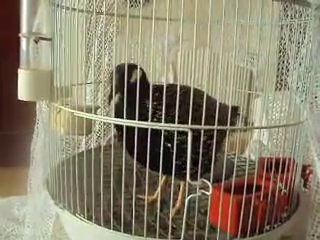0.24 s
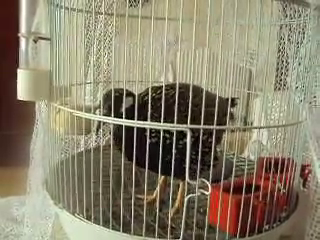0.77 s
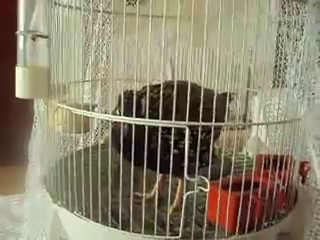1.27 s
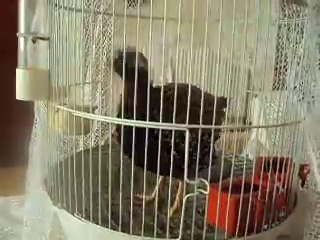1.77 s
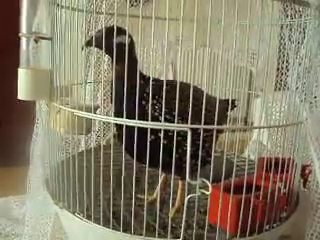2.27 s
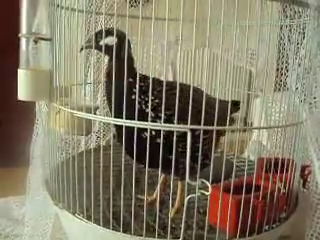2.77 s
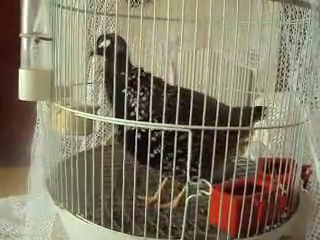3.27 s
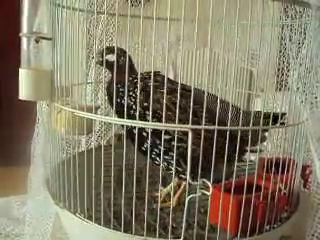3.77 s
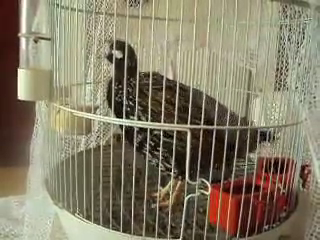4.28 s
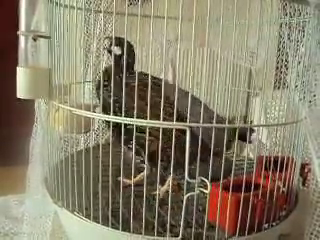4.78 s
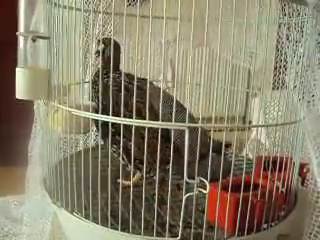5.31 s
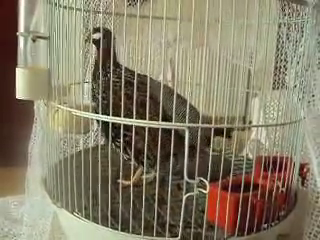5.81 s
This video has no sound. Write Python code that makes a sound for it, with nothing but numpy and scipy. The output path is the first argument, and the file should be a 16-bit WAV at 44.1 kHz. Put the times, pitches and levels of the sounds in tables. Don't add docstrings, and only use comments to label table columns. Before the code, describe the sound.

A caged bird whistles once, softly brushes the floor, then bursts into five grating, overloaded calls while a vehicle engine drones dully outside.

```python
import sys
import numpy as np
from scipy import signal
from scipy.io import wavfile
from scipy.ndimage import uniform_filter1d

SR = 44100
rng = np.random.default_rng(int(sys.argv[2]) if len(sys.argv) > 2 else 0)


def int16_out(signal):
    q = np.round(np.clip(np.atleast_2d(signal).T, -1, 1) * 32767)
    wavfile.write(sys.argv[1], SR, q.astype(np.int16))


def boost(x):
    u = np.asarray(x, float) / 20
    return 10 ** u


N = 266760

# start [t/s], length [t/s], effort [level/dB], swell time [t/s], low throat band [f/Hz]
RASPS = [
    (3.559, 0.1033, -24, 0.0068, 3054),
    (4.054, 0.2063, -13.5, .008, 3338),
    (4.43, 0.2592, -14.5, 0.023, 3174),
    (4.998, .102, -14, 0.035, 3037),
    (5.141, 0.1795, -16, 0.039, 3157),
]


def evened(x):
    return x / np.sqrt(np.mean(x ** 2) + 1e-20)


def read(points, hz):
    f, value = np.transpose(points)
    return np.interp(np.log(hz + 1), np.log(f + 1), value)


def curves(rows):
    s, *columns = np.transpose(rows)
    t = np.arange(s[0], s[-1], 1 / SR)
    return s[0], [np.interp(t, s, c) for c in columns]


def add(mix, s, sound):
    part = mix[round(s * SR):][:len(sound)]
    part += sound[:len(part)]


def resonate(x, hz, width):
    turn = np.exp(2j * np.pi * np.cumsum(hz * np.ones(len(x))) / SR)
    r = np.exp(-np.pi * width / SR)
    smoothed = signal.lfilter([1], np.convolve([1, -r], [1, -r]), x / turn)
    return 2 * (turn * smoothed).real


def street():
    traffic = [(0, 28.21, -10), (.9, 27.97, -9), (1.04, 27.91, -7), (1.1, 28.06, -1.5), (2.3, 28.11, -0.5),
               (2.9, 27.9, -3), (3.45, 28.24, -3), (3.85, 27.66, 0), (4.9, 26.79, -6), (5.3, 32.65, -1),
               (5.5, 32.09, -1.5), (5.8, 31.14, -2), (6.05, 29.8, -4)]
    s, *columns = np.transpose(traffic)
    return [np.interp(np.arange(N) / SR, s, c) for c in columns]


def wash():
    # [f/Hz], [level/dB]
    colour = [(20, -6.5), (60, 6.5), (200, 10.5), (240, 2), (500, -2), (1000, -7), (2000, -15.5),
              (5000, -23.5)]
    level_db, near_share = -53, .85
    duck_db, duck_lag_s, duck_s = -6.5, 0.14, 0.063

    hz = np.fft.rfftfreq(1024, 1 / SR)
    a, b, patches = rng.standard_normal((N // 256 + 5, 513, 3)).T
    patches = uniform_filter1d(uniform_filter1d(patches, size=8, axis=0), size=12, axis=1)
    z = (a + 1j * b) * boost(read(colour, hz)[:, None] + 1.4 * evened(patches))
    noise = evened(signal.istft(z, nperseg=1024, noverlap=768)[1][:N])

    t = np.arange(N) / SR
    duck = sum(np.exp(-((t - s - length - duck_lag_s) / duck_s) ** 2) for s, length, *_ in RASPS)
    near_db = street()[1]
    return boost(level_db + near_share * near_db + duck_db * duck) * noise


def engine():
    multiples = [(1, -72.5, 1.1), (2, -57, 2), (3, -60, 1.3), (4, -46.5, 0.822), (5, -51.5, 1.9),
                 (6, -48, 1.5), (7, -49, .7), (8, -80, 1.1)]
    # [t/s], multiple [number], change [level/dB], half length [t/s]
    fades = [(0.14, 4, -15, 0.115), (0.745, 4, -14, 0.102), (1.365, 4, -10, 0.077), (1.983, 4, -5.5, 0.103),
             (2.521, 4, -15, 0.182), (2.85, 4, -6.5, 0.126), (3.501, 4, -4.5, 0.153), (5.6, 4, -5, 0.418),
             (.5, 5, -9.5, 0.068), (1.837, 5, -6.5, 0.183), (2.2, 5, 3.5, 0.65), (2.92, 5, -4.5, 0.177),
             (2.3, 6, 2.5, 0.369), (3.452, 6, -3.5, 0.35), (3.963, 6, -2.5, 0.17), (.05, 7, -6, 0.253),
             (1.459, 7, -3, 0.84), (1.936, 7, -11.5, 0.035), (2.207, 7, -13, 0.169),
             (3.45, 7, -10.5, 0.188), (3.968, 7, -11.5, 0.158), (5.55, 7, -29.5, 0.14),
             (1.25, 3, 4.5, 0.43), (4.85, 3, 9, .2)]

    (hz, near_db), t = street(), np.arange(N) / SR
    turns = 2 * np.pi * np.cumsum(hz) / SR
    revving_db = 5.0 * np.maximum(hz - 28.5, 0)
    knots = np.linspace(0, N, 16)
    steps = rng.standard_normal((len(knots), len(multiples)))
    drifts = np.cumsum(steps, axis=0).T + 2 * np.pi * rng.random((len(multiples), 1))
    out = np.zeros(N)
    for (k, db, share), drift in zip(multiples, drifts):
        level_db = db + share * near_db
        for s, which, depth_db, half in fades:
            if round(which) == round(k):
                level_db = level_db + depth_db * np.exp(-((t - s) / half) ** 2)
        if k < 3.5:
            level_db = level_db + revving_db / k
        phase = round(k) * turns + np.interp(np.arange(N), knots, drift)
        out += np.sqrt(2) * boost(level_db) * np.sin(phase)
    return out


def tail():
    # [f/Hz], time to die by 60 dB [t/s]
    decay = [(300, 0.787), (1300, 0.29), (2400, .3), (2950, 0.457), (3600, 0.387), (4100, 0.35),
             (5500, 0.366)]
    taps = np.zeros(SR)
    at = np.arange(330, SR - 20, 12)
    taps[at + rng.integers(0, 12, len(at))] = rng.choice([-1., 1.], len(at))
    hz, t, z = signal.stft(taps, SR, nperseg=128)
    fall = boost(-60 * t / read(decay, hz)[:, None])
    decayed = signal.istft(z * fall, SR, nperseg=128)[1]
    return decayed / np.linalg.norm(decayed)


def room(x):
    turn = 2 * np.pi * 1.3 * np.arange(N) / SR
    echoes = sum(signal.fftconvolve(x * share, tail())[:N] for share in (np.sin(turn), np.cos(turn)))
    return boost(-3) * echoes


def scuff(level_db, rise, centre_hz):
    t60_s, drag, spread = 0.0977, 4.7, 1.9
    t = np.arange(SR // 3) / SR
    air, grit = rng.standard_normal((len(t), 2)).T
    band = signal.butter(3, (centre_hz / spread, centre_hz * spread), "band", fs=SR, output="sos")
    grit_db = 2.7 * uniform_filter1d(grit, size=60) * np.sqrt(60)
    brush = evened(signal.sosfilt(band, air * boost(grit_db)))
    fall = boost(level_db - 60 * t / (t60_s + drag * rise))
    return fall * (1 - np.exp(-t / rise)) * brush


def glide(rows):
    s, (hz, db) = curves(rows)
    shake = evened(uniform_filter1d(rng.standard_normal(len(hz)), size=60))
    tone = np.sin(2 * np.pi * np.cumsum(hz) / SR)
    return s, np.sqrt(2) * boost(db + 1.5 * shake) * tone * signal.windows.tukey(len(hz), .12)


def pip(s, length, from_hz, to_hz, level_db):
    share = np.array([0, .42, .58, 1])
    db = level_db - 13 * np.array([1, 0, 0, 1])
    return glide(np.transpose([s + length * share, from_hz + (to_hz - from_hz) * share, db]))


def rasp(s, length, effort_db, swell, low_hz):
    widths = (374.2, 467, 626, 240)
    # [f/Hz], width [f/Hz], [level/dB]
    windpipe = (1280, 70, -16.5)
    start_db, tire_db, flutter_db, close_s = -5, -1.5, 1.5, 0.014
    flaps_per_s, flap_jitter, flap_puff = 232, .12, 0.18
    middle_hz, high_hz, beak_hz, wander = 4015.3, 5013.4, 5490, .018

    t = np.arange(0, length, 1 / SR)
    effort_db = effort_db + start_db * np.maximum(1 - t / swell, 0) + tire_db * t / length
    low_hz = low_hz - 800 * t
    middle_db = -4 + 22.5 * (low_hz - 3062.4) / 1000
    high_db = -1.5 + 3 * abs(s - RASPS[1][0]) + 4.5 * t / length

    wobble, flutter, *draws = rng.standard_normal((SR // 3, 11))[:len(t)].T
    jitter = flap_jitter * evened(uniform_filter1d(wobble, size=300))
    turns = np.cumsum(flaps_per_s * (1 + jitter)) / SR
    puffs = np.array(draws[:5]) * (0.25 + np.exp(-(turns % 1) / flap_puff))
    drifts = [1 + wander * evened(uniform_filter1d(d, size=500)) for d in draws[5:]]

    centres = (low_hz, middle_hz, high_hz, beak_hz)
    levels_db = (0, middle_db, high_db, high_db - 5.5)
    voice = np.zeros(len(t))
    for air, drift, hz, width, db in zip(puffs, drifts, centres, widths, levels_db):
        voice += boost(db) * evened(resonate(air, hz * drift, width))
    passage = signal.butter(4, (2800, 5700), "band", fs=SR, output="sos")
    voice += boost(1 + middle_db / 2) * evened(signal.sosfilt(passage, puffs[4]))
    voice += boost(windpipe[2]) * evened(resonate(puffs[0], windpipe[0], windpipe[1]))

    unsteady = uniform_filter1d(uniform_filter1d(flutter, size=400), size=200)
    effort_db = effort_db + flutter_db * evened(unsteady)
    edges = np.minimum(t / .003, 1) ** 2 * np.minimum((length - t) / close_s, 1)
    return s, boost(effort_db - 4.5) * voice * edges


def scene():
    # [t/s], [level/dB], rise [t/s], centre [f/Hz]
    scuffs = [(1.022, -56.5, 0.00455, 300), (1.63, -37.5, 0.0038, 620), (3.08, -64.5, 0.0038, 400),
              (3.192, -48, .001, 674), (3.225, -43.5, 0.026, 697.3), (3.51, -48.5, .001, 750),
              (5.53, -50.5, 0.00399, 700.7), (5.57, -55.5, .01, 600), (5.72, -59, .003, 735.6),
              (5.795, -48.5, 0.00598, 620.3), (5.84, -52, .002, 620), (5.867, -58, 0.0021, 618.8),
              (5.905, -60, .001, 625)]
    # [t/s], pitch [f/Hz], [level/dB]
    whistle = [(1.066, 2620, -58), (1.085, 2950, -39), (1.097, 3160, -25), (1.108, 3330, -33),
               (1.125, 3450, -34), (1.146, 3550, -30.5), (1.162, 3620, -35), (1.168, 3620, -46)]
    # start [t/s], length [t/s], from [f/Hz], to [f/Hz], [level/dB]
    pips = [(1.052, .016, 2380, 2600, -46), (1.169, .014, 3600, 3550, -29), (1.185, .014, 3550, 3530, -42),
            (1.205, .028, 3700, 3820, -48), (3.5455, .009, 3900, 3800, -15.5),
            (3.5515, .006, 3750, 2900, -18), (3.555, .011, 3100, 1300, -28),
            (3.5625, .007, 1350, 1200, -26), (3.553, .008, 5500, 4500, -21), (3.559, .008, 4600, 3650, -17),
            (3.558, .014, 3200, 2450, -29), (3.574, .014, 2700, 2850, -28), (3.581, .006, 4100, 4600, -19),
            (3.585, .014, 4150, 3300, -19), (3.581, .006, 5450, 5550, -20), (3.596, .014, 3300, 2750, -25),
            (3.607, .016, 3200, 3850, -22), (3.62, .007, 3750, 4250, -11), (3.634, .005, 4400, 4800, -16),
            (3.655, .012, 4900, 5500, -25), (4.428, .01, 1200, 1650, -30), (4.993, .011, 1220, 1600, -25)]

    bird = np.zeros(N)
    for s, *stroke in scuffs:
        add(bird, s, scuff(*stroke))
    add(bird, *glide(whistle))
    for row in pips:
        add(bird, *pip(*row))
    for row in RASPS:
        add(bird, *rasp(*row))
    return (wash() + engine() + room(bird) + bird)[None]


def roll_off(x):
    return signal.sosfilt(signal.butter(12, 15830, fs=SR, output="sos"), x)


def record(dry):
    # [f/Hz], [level/dB], end [t/s]
    whine = [(497, -70.5, 1.05), (1500, -80, 0.9), (2020, -84, 2.8), (2960, -82, 4.3), (4000, -97.5, 6.1),
             (5130, -101, 4.3)]
    step, bottom, top = 4, -0.668, 0.37
    hiss_db, grit_db, offset, ceiling = -68, -24.5, 0.0049, .732

    t = np.arange(0, N, step) / SR
    x = dry[0, ::step]
    low_band = signal.butter(1, (230, 2200), "band", fs=SR / step)
    x = x - signal.lfilter(*low_band, np.minimum(x ** 2, .4))

    hiss, grit = rng.standard_normal((len(x), 2)).T
    grit = evened(signal.lfilter([1], [1, -.4, -.35], grit))
    slope = np.sqrt(abs(uniform_filter1d(np.diff(x, prepend=0) ** 2, size=40)))
    x = x + boost(grit_db) * grit * slope
    x = np.where(x > 0, top * np.tanh(x / top), np.maximum(x, bottom))
    x = x + boost(hiss_db) * hiss
    for hz, db, end in whine:
        x = x + np.sqrt(2) * boost(db) * np.sin(2 * np.pi * hz * t) * (t < end)

    sparse = np.zeros(N)
    sparse[::step] = step * x
    smooth = signal.firwin(139, 5490, window=("kaiser", 10), fs=SR)
    full = signal.oaconvolve(sparse, smooth, "same") + offset
    full = np.clip(full, -ceiling, ceiling)
    return roll_off(full[None])


dry = scene()
out = record(dry)
int16_out(out)
```